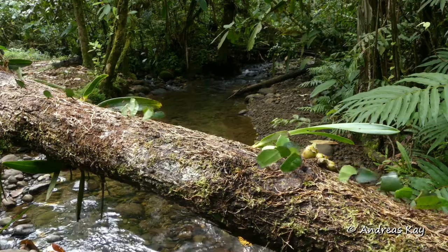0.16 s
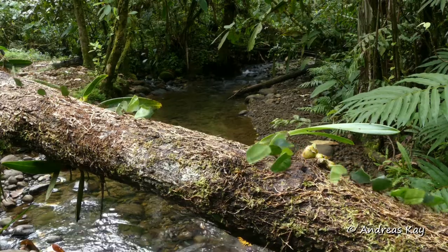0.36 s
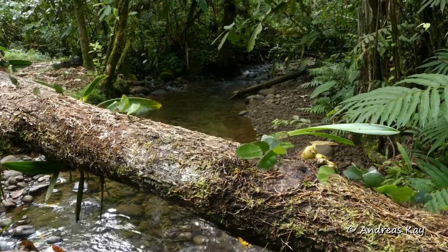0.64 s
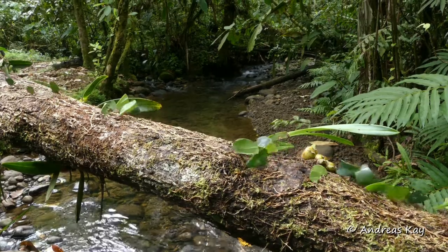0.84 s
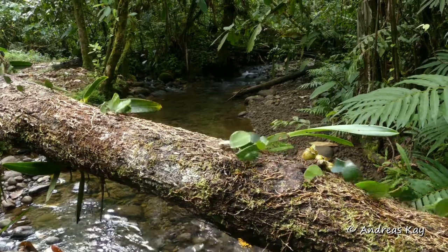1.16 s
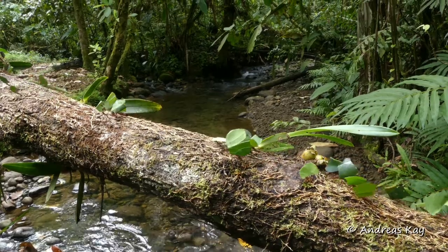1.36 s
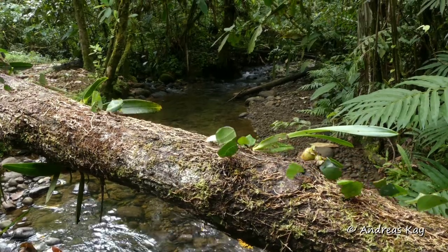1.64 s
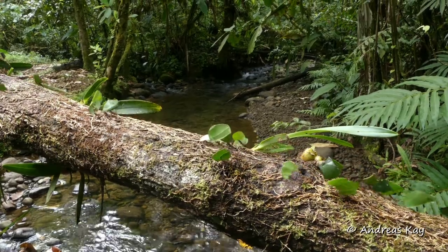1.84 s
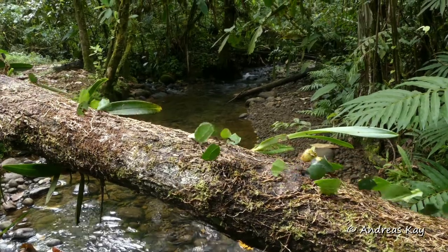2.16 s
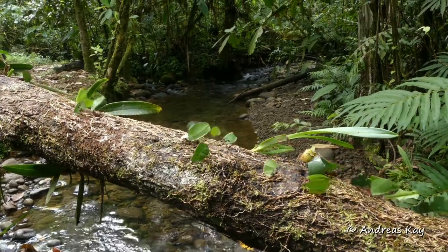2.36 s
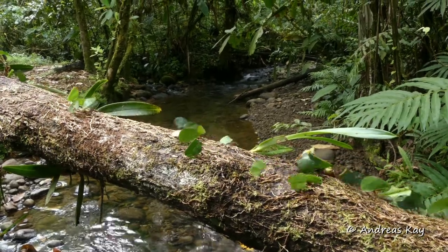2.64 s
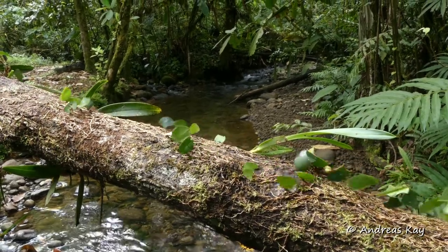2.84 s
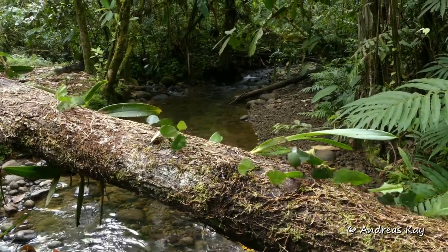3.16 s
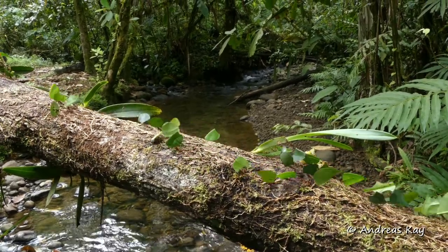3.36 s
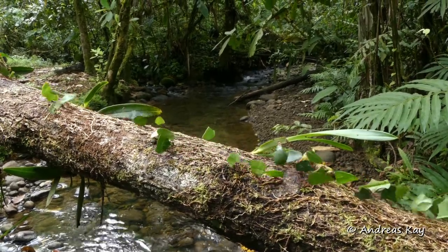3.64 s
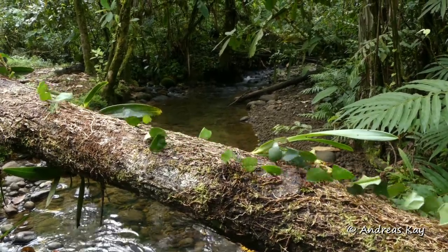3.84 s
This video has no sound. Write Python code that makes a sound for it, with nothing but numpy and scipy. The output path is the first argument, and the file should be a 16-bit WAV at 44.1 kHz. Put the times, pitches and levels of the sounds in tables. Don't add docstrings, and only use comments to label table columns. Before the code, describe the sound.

After 0.2 s of silence, a shallow stream fades in within a second, washing, gurgling and fizzing over stones. From about 0.4 s a near cricket gives short, high, rapidly pulsed chirps every 0.4 s, with slight woodland echo, over a steady thin far chorus. Spray swells near 1.2 s, sharp splashes slap around 1.9 s, bubbles crowd near 3.1 s, and the flow continues to the end at 4 s.

```python
import sys
import numpy as np
from scipy import signal
from scipy.io import wavfile
from scipy.ndimage import uniform_filter1d

SR = 44100
rng = np.random.default_rng(int(sys.argv[2]) if len(sys.argv) > 2 else 0)


def put_to_file(sound):
    columns = np.atleast_2d(sound).T
    safe = np.clip(columns, -1, 1)
    whole_steps = np.round(safe * 32767)
    wavfile.write(sys.argv[1], SR, whole_steps.astype(np.int16))


def amplitude_ratio(level_db):
    exponent = np.asarray(level_db, float) / 20
    return 10 ** exponent


N = 176400

# frequency in Hz, density in dB per Hz.
RUSH_SPECTRUM = [(30, -57), (100, -16), (170, -16), (300, -6.5), (440, -0.5), (1000, -2.5), (1500, -7.5),
                 (3000, -12)]
# frequency in Hz, density in dB per Hz.
SPRAY_SPECTRUM = [(2500, -6), (4500, -17), (6300, 4), (8000, -4.5), (10000, 4), (13000, -0.5),
                  (15000, -5.5), (16000, -28)]
# frequency in Hz, left-right correlation from -1 to 1.
LIKENESS = [(60, -0.97), (130, -0.73), (200, -0.46), (300, 0.8), (1400, 0.84), (3100, 0.68), (6800, 0.68),
            (15000, 0.14)]
# frequency in Hz, left minus right in dB.
BALANCE = [(60, 0.5), (130, 0.5), (290, -1.5), (640, 0), (1410, 3), (3100, 0.5), (6820, -0.5), (15000, 4)]
# time in seconds, level in dB.
FLOW_EFFORT = [(.2, 2.5), (.27, 3), (.31, 0), (.36, 2), (.42, 0), (.75, 0.5), (1.1, 1.7), (1.6, 1.7),
               (2.0, 1.5), (2.6, 1.5), (3.1, 2.5), (3.35, 2), (3.55, 0.95), (4, 2)]
# time in seconds, level in dB.
SPRAY_GUSTS = [(0, 4), (.9, 0), (1.05, 2.5), (1.2, 5.5), (1.35, 4.5), (1.5, 2), (2.3, 2), (2.7, 1.5),
               (3.4, 1), (3.5, 3), (4, 0.5)]
# start in seconds, peak in dB, pitch in Hz, length in cycles.
BUBBLES = [(.237, -21, 520, 6), (.268, -19, 450, 6), (.335, -19, 640, 9), (.545, -19.5, 430, 6),
           (.59, -18, 483, 5.1), (.695, -28, 222, 5.4), (.895, -17.5, 450, 6.4),
           (0.985, -16, 850, 9.4), (1.18, -16.5, 683, 9.6), (1.298, -15, 505, 15),
           (1.245, -19, 866, 9.3), (1.33, -23, 766, 7.1), (1.35, -27, 520, 4.2),
           (1.442, -18, 355, 4.6), (1.526, -14.5, 600, 14.5), (1.545, -18.5, 399, 12.4),
           (1.548, -24.5, 273, 5.7), (1.802, -15.5, 692, 8.1), (1.855, -17.5, 1200, 11),
           (1.948, -20, 358, 4.1), (1.959, -15.5, 1050, 11), (2.04, -22.5, 422, 16),
           (2.189, -19, 565, 15), (2.258, -16.5, 982, 19), (2.339, -21, 416, 14),
           (2.365, -22, 473, 5), (2.532, -26.5, 267, 11), (2.795, -20.5, 377, 7.8),
           (2.875, -19, 413, 15), (2.877, -15, 1160, 9.1), (3.022, -18, 301, 6.9),
           (2.96, -21, 396, 7), (3.286, -20, 437, 6), (3.049, -13.5, 604, 9.6),
           (3.133, -13, 405, 5.6), (3.168, -18, 412, 9.3), (3.241, -14.5, 923, 13),
           (3.317, -20, 440, 8.8), (3.916, -31, 990, 7.9)]
# start in seconds, peak in dB, pitch in Hz,
# length in cycles.
MORE_BUBBLES = [(.405, -16, 947, 10), (.41, -28, 3165, 25), (.41, -19.5, 538, 7.4),
                (.449, -19.5, 1464, 14), (.709, -22, 2420, 22), (.857, -24, 2540, 22),
                (.896, -15.5, 968, 10), (1.067, -22, 1920, 18), (1.079, -22, 1765, 16),
                (1.171, -22, 1260, 12), (1.221, -32, 3294, 28), (1.266, -27, 2440, 22),
                (1.577, -24, 2885, 25), (1.62, -25, 3100, 30), (1.71, -18.5, 1360, 16),
                (1.73, -22, 3445, 28), (1.79, -23, 3000, 26), (1.928, -20.5, 328, 6.2),
                (2.155, -27, 3359, 30), (2.249, -25, 3380, 28), (2.312, -24, 2430, 25),
                (2.324, -23, 1722, 16), (2.374, -25, 2777, 24), (2.387, -21, 1399, 15),
                (2.489, -24, 2470, 25), (2.498, -22, 2906, 27), (2.54, -29, 1442, 14),
                (2.716, -24, 3530, 28), (2.929, -19, 1000, 16), (2.931, -18, 1190, 14),
                (2.948, -17, 700, 10), (3.03, -18, 633, 7), (3.047, -30, 3445, 28), (3.083, -20, 2750, 16),
                (3.088, -19, 2300, 14), (3.099, -16.5, 1180, 10), (3.105, -16, 861, 9.9),
                (3.118, -15.5, 700, 9.2), (3.15, -16, 520, 4.8), (3.241, -21, 3122, 22),
                (3.258, -30, 2430, 22), (3.258, -24, 1670, 12), (3.278, -20, 2024, 16),
                (3.281, -24, 1700, 12), (3.075, -20, 910, 12), (2.385, -19, 1150, 9),
                (3.499, -24, 1730, 16), (3.821, -23, 3020, 25)]
# start in seconds, peak in dB, centre in Hz, tail level in dB.
SPLASH_EVENTS = [(0.612, -15, 3700, -41), (.945, -30, 10000, -39), (1.04, -36, 10000, -39),
                 (1.14, -34, 8200, -44), (1.629, -34, 9500, -40), (1.857, -13.5, 2070, -36),
                 (1.885, -11.5, 3800, -39), (1.969, -14, 3230, -44), (2.38, -15, 3000, -41),
                 (2.598, -14, 2680, -38), (2.719, -24, 3430, -52), (3.068, -18, 5900, -40),
                 (3.086, -22, 2230, -36), (3.245, -28, 3040, -42), (3.281, -21, 1800, -29.5),
                 (3.461, -24, 5540, -32), (3.462, -32, 10500, -44), (3.62, -36, 11000, -43),
                 (3.691, -21, 6000, -37), (3.819, -27, 10500, -38)]
# start in seconds, level in dB.
CRICKET_CHIRPS = [
    (0.4254, -30),
    (0.821, -31.5),
    (1.2416, -29.5),
    (1.6366, -28.5),
    (2.0187, -29.5),
    (2.4136, -29.5),
    (2.823, -31.5),
    (3.1852, -29.5),
    (3.5702, -31.5),
    (3.961, -29.5),
]
# centre in Hz, width in Hz, level in dB.
CHORUS_BANDS = [(6950, 240, -47.5), (7114, 220, -47), (7250, 200, -42.5), (7320, 100, -49), (7580, 90, -51),
                (7460, 60, -65), (8940, 170, -54.5)]
# time in seconds, level in dB.
FADE_IN = [(.2, -30), (.3, -20), (.36, -13.5), (.41, -9.5), (.47, -7.5), (.62, -6), (.9, -3.5), (1.0, -3.5)]


def evened(x):
    return x / np.sqrt(np.mean(x ** 2) + 1e-20)


def read(points, hz):
    table_hz, value = np.transpose(points)
    return np.interp(np.log(hz + 1), np.log(table_hz + 1), value)


def curve(points, t):
    return np.interp(t, *np.transpose(points))


def add(mix, start_s, sound):
    part = mix[..., round(start_s * SR):][..., :sound.shape[-1]]
    part += sound[..., :part.shape[-1]]


def above(x, hz):
    return signal.sosfilt(signal.butter(3, hz, "high", fs=SR, output="sos"), x)


def resonate(x, hz, width_hz):
    turn = np.exp(2j * np.pi * hz * np.arange(x.shape[-1]) / SR)
    r = np.exp(-np.pi * width_hz / SR)
    once = signal.lfilter([1 - r], [1, -r], x / turn)
    twice = signal.lfilter([1 - r], [1, -r], once)
    return 2 * (turn * twice).real


def rush_db(hz):
    octaves_above = np.maximum(np.log2((hz + 1) / RUSH_SPECTRUM[-1][0]), 0)
    return read(RUSH_SPECTRUM, hz) - 8 * octaves_above


def spray_db(hz):
    return read([(1200, -40), *SPRAY_SPECTRUM], hz)


def wash(shape_db, patchy_db, swell_db, flicker_db, size):
    hop, bins = size // 4, size // 2 + 1
    frames, hz = N // hop + 5, np.fft.rfftfreq(size, 1 / SR)
    a, b, c, d, patches, flicker = rng.standard_normal((frames, bins, 6)).T
    patches = uniform_filter1d(patches, size=10, axis=0)
    patches = evened(uniform_filter1d(patches, size=12, axis=1))
    flicker = uniform_filter1d(flicker, size=bins // 3, axis=0)
    flicker = evened(uniform_filter1d(flicker, size=3, axis=1))
    t = np.arange(frames) * hop / SR
    swell = np.zeros(frames)
    for swell_hz in np.geomspace(1, 12, 20):
        swell += np.sin(2 * np.pi * (swell_hz * t + rng.random())) / np.sqrt(swell_hz)
    level_db = patchy_db * patches + swell_db * evened(swell) + flicker_db * flicker
    same = np.clip(read(LIKENESS, hz), -1, 1)[:, None]
    lean = amplitude_ratio(read(BALANCE, hz) / 2)[:, None]
    left = a + 1j * b
    right = same * left + np.sqrt(1 - same ** 2) * (c + 1j * d)
    z = np.array([left * lean, right / lean]) * amplitude_ratio(shape_db(hz)[:, None] + level_db)
    return evened(signal.istft(z, nperseg=size, noverlap=size - hop)[1][:, :N])


def bubble(hz, cycles, glide):
    u = np.arange(0, 2 * cycles / hz, 1 / SR) * hz / cycles
    shape = np.minimum(u / .3, 1) * np.exp(-1.6 * u) * np.cos(np.pi * u / 4)
    return shape * np.sin(2 * np.pi * cycles * (u + glide * u ** 2 / 2))


def bubbles(lo_hz, hi_hz, per_s, cycles, glide, spread_db, wide, count):
    out = np.zeros((2, N))
    for hz in np.geomspace(lo_hz, hi_hz, count):
        pick, big, place = rng.random((3, N))
        chance = per_s / count * np.sqrt(hz / np.sqrt(lo_hz * hi_hz)) / SR
        bursts = amplitude_ratio(spread_db * np.minimum(-np.log(big + 1e-9), 4)) * (pick < chance)
        angle = np.pi / 4 + wide * (2 * place - 1) - read(BALANCE, hz) / 14.0
        placed = bursts * np.array([np.cos(angle), np.sin(angle)])
        ringing = signal.oaconvolve(placed, bubble(hz, cycles, glide)[None])[:, :N]
        out += amplitude_ratio(rush_db(hz)) * np.sqrt(hz) * evened(ringing)
    return evened(above(out, 0.79 * lo_hz))


def stream():
    t = np.arange(N) / SR
    flow_db = curve(FLOW_EFFORT, t)
    body = amplitude_ratio(-29) * wash(rush_db, patchy_db=1.5, swell_db=0.32, flicker_db=0.57, size=1024)
    gurgle = amplitude_ratio(-35) * bubbles(281.8, 1578, per_s=350, cycles=8.5, glide=0.041,
                                spread_db=0.7, wide=0.8, count=16)
    fizz = amplitude_ratio(-36) * bubbles(1580, 9020, per_s=2500, cycles=8.55, glide=0.23,
                              spread_db=1.0, wide=0.69, count=14)
    spray = amplitude_ratio(-42) * wash(spray_db, patchy_db=2.0, swell_db=-0.14, flicker_db=1.5, size=512)
    water = (body + gurgle) * amplitude_ratio(flow_db) + fizz * amplitude_ratio(0.58 * flow_db)
    return water + spray * amplitude_ratio(curve(SPRAY_GUSTS, t))


def plops():
    out = np.zeros((2, N))
    for events in (BUBBLES, MORE_BUBBLES):
        for start_s, db, hz, cycles in events:
            add(out, start_s, amplitude_ratio(db) * np.array([[1.05], [.95]]) * bubble(hz, cycles, glide=0.026))
    return out


def splashes():
    tick_cycles, tail_s, rise_s, relative_width = 3, .045, .0062, .55
    out = np.zeros((2, N))
    t = np.arange(4000) / SR
    for start_s, db, hz, tail_db in SPLASH_EVENTS:
        tick = np.minimum(t * hz / 2, 1) * np.exp(-t * hz / tick_cycles) * np.sin(2 * np.pi * hz * t)
        spit = rng.standard_normal((3, 4000))
        droplets = evened(resonate(spit[0] + .5 * spit[1:], hz, relative_width * hz))
        tail = droplets * np.exp(-t / tail_s) * np.minimum(t / rise_s, 1)
        add(out, start_s, amplitude_ratio(db) * tick + amplitude_ratio(tail_db) * tail)
    return out


def trunk_echo(dry):
    t60_s, first_s = .45, .012
    t = np.arange(SR // 2) / SR
    hits = rng.standard_normal((3, len(t))) * (rng.random(len(t)) < .05)
    hits = hits * amplitude_ratio(-60 * t / t60_s) * (t > first_s)
    trunks = hits[0] + .4 * hits[1:]
    trunks = trunks / np.linalg.norm(trunks[0])
    return signal.fftconvolve(dry[None], trunks, axes=1)[:, :N]


def cricket():
    pulse_s, pulse_gap_s, lead_s = .0142, .01915, .0008
    wing_hz, start_hz, end_hz = 7464, -240, -40
    scatter_db, droop_db, overtone_db = 1.0, .1, -23
    dry = np.zeros(N)
    u = np.arange(0, pulse_s, 1 / SR) / pulse_s
    hz = wing_hz + start_hz * np.exp(-u / .22) + end_hz * u ** 4
    edges = np.clip(np.minimum(u / .12, (1 - u) / .15), 0, 1)
    dip = .7 * np.exp(-((u - .62) / .13) ** 2)
    for chirp_s, db in CRICKET_CHIRPS:
        for k, (level, pitch, phase) in enumerate(rng.standard_normal((8, 3))):
            turn = 2 * np.pi * np.cumsum(hz + 6 * pitch) / SR + phase
            shape = edges * (1 - dip * (1 if k else .4))
            tone = np.sin(turn) + amplitude_ratio(overtone_db) * np.sin(2 * turn)
            pulse_db = db + scatter_db * level - droop_db * k
            add(dry, chirp_s - lead_s + k * pulse_gap_s, amplitude_ratio(pulse_db) * shape * tone)
    return dry + amplitude_ratio(-6) * trunk_echo(dry)


def chorus():
    same, throb_depth = .87, .22
    out, t = np.zeros((2, N)), np.arange(N) / SR
    for hz, width_hz, db in CHORUS_BANDS:
        both, left, right = rng.standard_normal((3, N))
        drive = np.sqrt(same) * both + np.sqrt(1 - same) * np.array([left, right])
        throb = 1 + throb_depth * np.sin(2 * np.pi * (rng.uniform(48, 58) * t + rng.random()))
        out += amplitude_ratio(db) * evened(resonate(drive * throb, hz, width_hz))
    return out


def notch_above_wing(insects):
    return insects - .9 * resonate(insects, hz=7507, width_hz=70)


def scene():
    events = above(plops() + splashes(), hz=147)
    return stream() + events + notch_above_wing(cricket() + chorus())


def low_pass(x):
    return signal.sosfilt(signal.butter(12, 15760, fs=SR, output="sos"), x)


def record(dry):
    start_s, edge_lo_hz, edge_hi_hz = .2, 15200, 15790
    t = np.arange(N) / SR
    faded = dry * amplitude_ratio(curve(FADE_IN, t)) * (t >= start_s)
    hz, frames, z = signal.stft(faded, SR, nperseg=512, noverlap=384)
    hop = uniform_filter1d(rng.random(len(frames) // 8 + 1), size=2).repeat(8)[:len(frames)]
    edge_hz = edge_lo_hz + (edge_hi_hz - edge_lo_hz) * np.clip(1.8 * hop - .45, 0, 1)
    limited = signal.istft(z * (hz[:, None] < edge_hz), SR, nperseg=512, noverlap=384)[1][:, :N]
    return low_pass(limited)


dry = scene()
out = record(dry)
put_to_file(out)
```